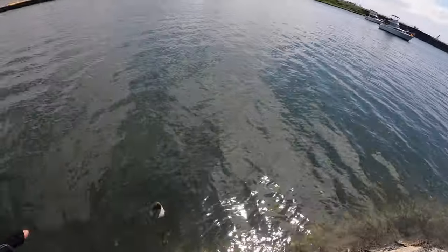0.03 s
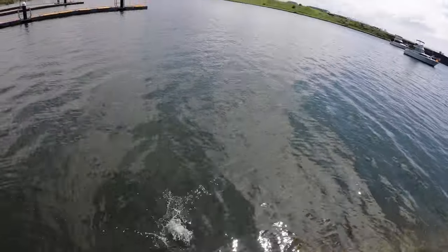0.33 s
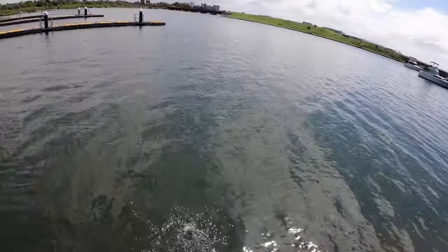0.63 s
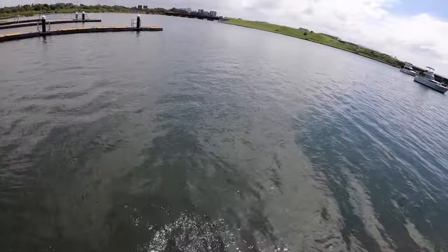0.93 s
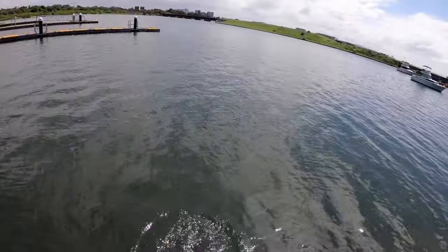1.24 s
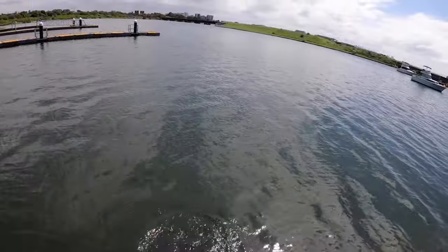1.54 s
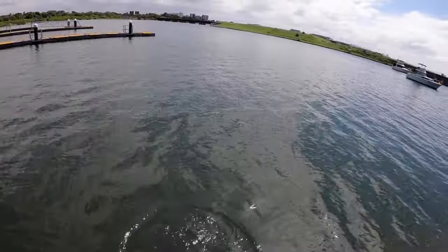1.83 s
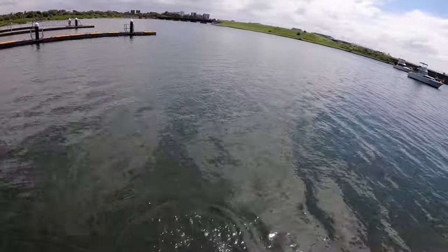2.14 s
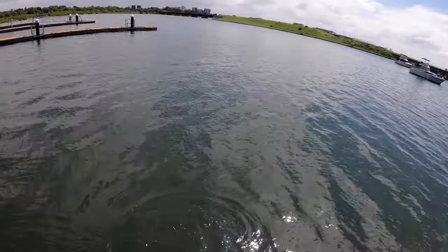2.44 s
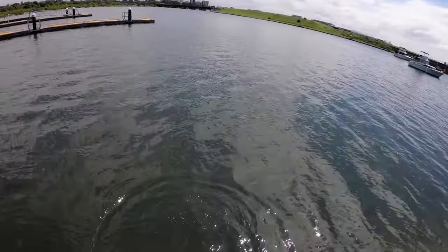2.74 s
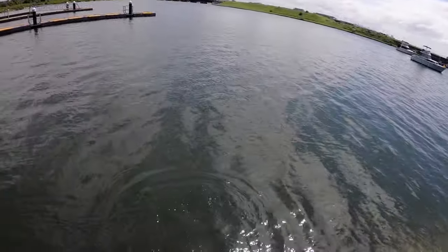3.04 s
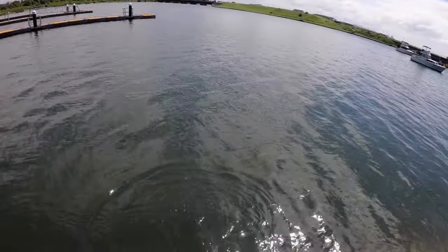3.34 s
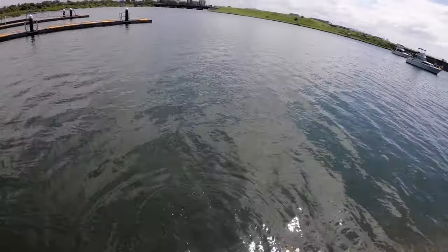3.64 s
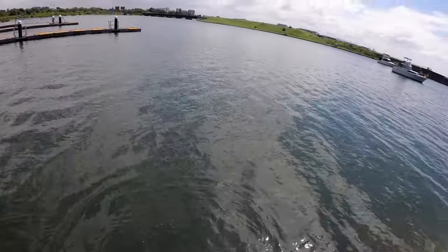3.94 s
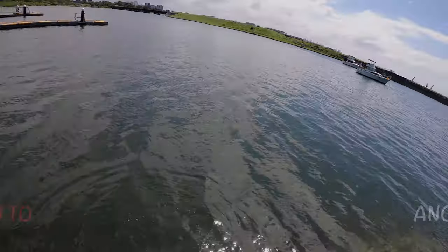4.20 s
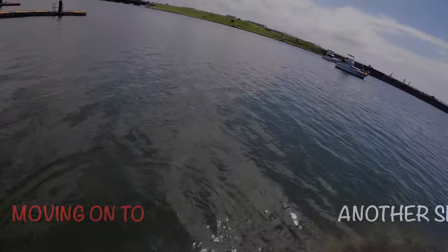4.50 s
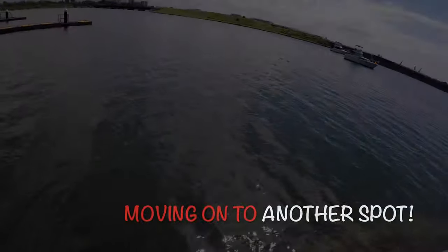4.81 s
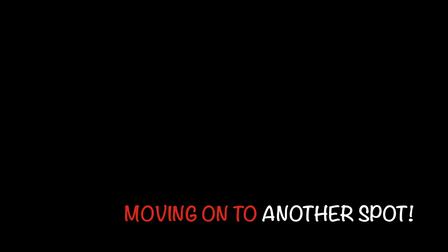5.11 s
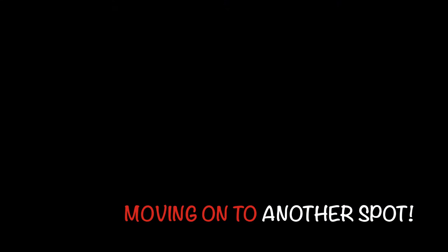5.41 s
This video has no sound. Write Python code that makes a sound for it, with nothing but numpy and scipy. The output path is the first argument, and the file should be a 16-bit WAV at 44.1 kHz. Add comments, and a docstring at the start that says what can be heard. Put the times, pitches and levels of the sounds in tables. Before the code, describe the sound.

Close to the microphone at the edge of a quiet harbour, a small fish lands with a short, bubbly splash and a patter of falling drops. The water settles into scattered little ticks and plops against the stones. Behind it are the low, wavering drone of a far boat engine, a soft wind rumble and a few very faint thin tones. It all fades away at the end.

```python
"""A slap and a gulp: a small fish, tossed back, hits a calm harbour and its air cavity pinches shut.
Thrown-up water falls back, spray patters and trapped bubbles ring. Wavelets then tick and fizz on the
shore stones. Behind are a far boat engine, a faint metallic ring, thin whines and light wind on the
microphone. A sleeve brushes past as everything fades out."""
import sys
import numpy as np
from scipy import signal
from scipy.io import wavfile
from scipy.ndimage import map_coordinates

SR = 44100
rng = np.random.default_rng(int(sys.argv[2]) if len(sys.argv) > 2 else 0)


def dump(signal):
    """Clip the signal to [-1, 1] and save it as 16-bit WAV at the path in sys.argv[1]."""
    limited = np.clip(np.atleast_2d(signal).T, -1, 1)
    pcm = np.round(limited * 32767).astype(np.int16)
    wavfile.write(sys.argv[1], SR, pcm)


N = 245195
T = np.arange(N) / SR

# splash spectrum: f/Hz, density/dB
SPLASH_SPECTRUM = [(290, -35.5), (500, -4.5), (620, -9.5), (716, -7), (1120, -12), (1370, -2.5),
                   (2130, -9.5), (2360, -7), (3190, -10.5), (4250, -16), (5510, -14), (7450, -23.5),
                   (8600, -20), (12300, -36.5), (15500, -51.5)]
# shore fizz spectrum: f/Hz, density/dB
FIZZ_SPECTRUM = [(1500, -2.5), (3000, 10), (4800, 6.5), (6000, 1), (8800, -12), (10500, -28.5),
                 (15000, -32.5)]


def from_db(db):
    return 10 ** (np.asarray(db) / 20)


def rms_one(x):
    return x / np.sqrt(np.mean(x ** 2) + 1e-20)


def panned(db, pan_db):
    """Left and right gains, pan_db apart."""
    return from_db(db + pan_db * np.array([[.5], [-.5]]))


def in_time(rows):
    """Each column of a curve, interpolated over T."""
    times, *columns = np.transpose(rows)
    return [np.interp(T, times, column) for column in columns]


def at_hz(points, hz):
    """A curve read on a log-frequency axis."""
    freqs, values = np.transpose(points)
    return np.interp(np.log(hz), np.log(freqs), values)


def swell(start_s, attack_s, hold_s, release_s):
    """Trapezoid envelope, 0 to 1 and back."""
    fall = 1 - (T - start_s - attack_s - hold_s) / release_s
    return np.clip(np.minimum((T - start_s) / attack_s, fall), 0, 1)


def drift(rate_hz):
    """Slow random wander, rms 1."""
    step = 40
    pole = np.exp(-2 * np.pi * rate_hz * step / SR)
    slow = signal.lfilter([1], [1, -2 * pole, pole * pole], rng.standard_normal(N // step + 2002))[2000:]
    return np.interp(np.arange(N) / step, np.arange(len(slow)), rms_one(slow))


def butter(x, hz, kind):
    """Second-order Butterworth filter."""
    sos = signal.butter(2, np.clip(hz, 10, .45 * SR), kind, fs=SR, output="sos")
    return signal.sosfilt(sos, x + 1e-18)


def ring(clicks, hz, t60_s):
    """Resonator: a unit click starts a decaying unit sine."""
    r, w = from_db(-60 / (t60_s * SR)), 2 * np.pi * hz / SR
    return signal.lfilter([0, np.sin(w)], [1, -2 * r * np.cos(w), r * r], clicks + 1e-18)


def stereo(mid, side, hz):
    """Mid and side to left and right, least alike near 3 kHz."""
    # left-right likeness: f/Hz, correlation
    likeness = [(60, 0.97), (250, 0.97), (640, 0.96), (1400, 0.55), (3000, 0.1), (6800, 0.16), (14000, 0.6)]
    alike = at_hz(likeness, hz)
    return np.sqrt(1 + alike) * mid + np.sqrt(1 - alike) * side * np.array([[1], [-1]])


def add(out, start_s, sound):
    """Mix in a short stereo sound."""
    at = int(start_s * SR)
    out[:, at:at + sound.shape[1]] += sound[:, :N - at]


def banded_noise(spectrum, patchy_db, flicker_hz):
    """Half-octave bands of stereo noise, each flickering by itself; rms 1."""
    out, edges = 0, 15 * 2 ** np.arange(0, 10.1, .5)
    white = rng.standard_normal((2, 2, N))
    for k, (low, high) in enumerate(zip(edges, edges[1:])):
        hz = np.sqrt(low * high)
        if spectrum[0][0] <= hz <= spectrum[-1][0]:
            mid, side = butter(white[k % 2], [low, high], "band")
            gain = from_db(at_hz(spectrum, hz) + patchy_db * drift(flicker_hz))
            out = out + gain * stereo(mid, side, hz)
    return rms_one(out)


def droplets(spectrum, per_s, spread_db, cycles, lowest_hz, pitches=28):
    """Random drops of uneven size, each ringing briefly at its own pitch and place; rms 1."""
    out = np.zeros((2, N))
    for hz in np.geomspace(lowest_hz, 14000, pitches):
        count = int(per_s * N / SR / pitches) + 1
        at = rng.integers(0, N, 20000)[:count]
        chance, place, sign = rng.random((3, 20000))[:, :count]
        size = from_db(spread_db * np.minimum(-np.log(chance), 4)) * np.sign(sign - .5)
        clicks = np.zeros((2, N))
        clicks[:, at] = stereo(size, size * np.sqrt(12) * (place - .5), hz)
        out += from_db(at_hz(spectrum, hz)) * np.sqrt(hz) * rms_one(ring(clicks, hz, cycles / hz))
    return rms_one(out)


def air(breeze_db=-30.5, gust_db=2.5, harbour_db=-40, top_hz=3560):
    """Wind rumbles on the microphone, with one gust; the harbour murmurs far off."""
    # wind spectrum: f/Hz, density/dB
    wind_spectrum = [(15, -28.5), (26, -6), (50, 1.5), (71, 0), (100, -2), (143, -10), (200, -13),
                     (280, -25), (500, -32), (1000, -62)]
    # far harbour spectrum: f/Hz, density/dB
    harbour_spectrum = [(100, -14), (200, 1.5), (330, 6.5), (560, 2.5), (800, 2), (1100, -0.5), (1450, -8),
                        (2000, -26.5), (2800, -44), (4000, -40), (7000, -53.5)]
    gust = swell(start_s=2.51, attack_s=.22, hold_s=.88, release_s=.33)
    wind = from_db(breeze_db + gust_db * gust) * banded_noise(wind_spectrum, patchy_db=.7, flicker_hz=4)
    harbour = from_db(harbour_db) * banded_noise(harbour_spectrum, patchy_db=1, flicker_hz=3.7)
    return butter(wind + harbour, top_hz, "low")


def engine(idle_hz=70.87, throttle_s=2.2, rise_hz_per_s=1.6, wander_hz=.16,
           waver_db=1.5, overtone_waver_db=1.87):
    """A far boat's exhaust note creeps up in pitch; moving air makes each partial waver."""
    # the note coming and going on the wind: t/s, fundamental/dB, overtones/dB
    levels = [(0.0, -25.5, -35), (0.35, -27.5, -47.5), (0.8, -28, -45), (1.3, -26.5, -45),
              (1.88, -26.5, -44), (2.0, -38.5, -41.5), (2.22, -24, -34), (2.45, -36.5, -39.5),
              (2.85, -27, -36), (3.25, -23, -34), (3.4, -27.5, -40.5), (3.71, -25, -39), (3.82, -41, -38),
              (4.1, -49, -36.5), (4.25, -34.5, -36), (4.8, -30, -38)]
    # exhaust overtones: multiple of the firing rate, level/dB
    overtones = [(2, -1.5), (2.75, -11.5), (3, -13), (4.55, -17.5)]
    firing_hz = idle_hz + rise_hz_per_s * np.maximum(T - throttle_s, 0)
    phase = 2 * np.pi * np.cumsum(firing_hz + wander_hz * drift(3.55)) / SR
    fundamental_db, overtones_db = in_time(levels)
    out = from_db(fundamental_db + waver_db * drift(4.7)) * np.sin(phase)
    for multiple, db in overtones:
        gain = from_db(overtones_db + db + overtone_waver_db * drift(.95))
        out += gain * np.sin(multiple * phase + .5 * drift(1.2))
    return np.sqrt(2) * out


def drone(hz=149.7, level_db=-36.5):
    """A second, higher far hum swells and sinks once."""
    gain = from_db(level_db) * swell(start_s=.03, attack_s=.27, hold_s=.48, release_s=.2)
    return np.sqrt(2) * gain * np.sin(2 * np.pi * hz * T)


def faint_tones(strands=9):
    """Thin tones swell and sink, each blurred into wandering strands."""
    # lingering tail of the opening metallic ring, then faint whines and high twitter:
    # start/s, end/s, f/Hz, level/dB, wander/Hz, decay/(dB/s)
    tones = [(0.231, 1.003, 1427, -51, 20.8, -3.5), (0.79, 0.898, 2205, -46, 55, 8),
             (0.884, 1.15, 2224, -56.5, 20, 38), (1.721, 1.87, 4300, -66.5, 410, -3),
             (1.9, 2.25, 4850, -76, 84, 4), (1.901, 2.35, 4360, -75.5, 90, 3),
             (2.445, 2.95, 4730, -79.5, 75, 2), (3.301, 3.752, 4600, -81, 91, -1)]
    out = np.zeros(N)
    for start_s, end_s, hz, db, wander_hz, decay_db_per_s in tones:
        during = (T > start_s) & (T < end_s)
        age_s = T[during] - start_s
        arch = np.sqrt(np.maximum(1 - (2 * age_s / (end_s - start_s) - 1) ** 2, 0))
        gain = from_db(db - decay_db_per_s * age_s) * arch * np.sqrt(2 / strands)
        for _ in range(strands):
            phase = 2 * np.pi * (rng.random() + np.cumsum(hz + wander_hz * drift(20)[during]) / SR)
            out[during] += gain * np.sin(phase)
    return out


def ping():
    """A faint metallic ring dies away at the start."""
    # ringing partials: f/Hz, level/dB, t60/s
    partials = [(1427, -43, 0.54), (4268, -71, 1.9)]
    return np.sqrt(2) * sum(from_db(db - 60 * T / t60_s) * np.sin(2 * np.pi * hz * T)
                            for hz, db, t60_s in partials)


def sleeve(whistle_db=4.5, width_hz=170, thinning_db_per_octave=28, scratch_db=9.5, patchy_db=.5):
    """Threads catch in scratchy grains; the weave whistles higher and thinner as it slides faster."""
    # sleeve stroke: t/s, whistle/Hz, level/dB
    stroke = [(4.17, 5800, -93), (4.24, 6000, -79), (4.34, 6750, -75), (4.41, 6160, -75), (4.46, 6800, -72),
              (4.53, 7300, -67.5), (4.6, 7900, -69), (4.67, 6700, -70), (4.72, 6000, -100)]
    # cloth scratch spectrum: f/Hz, density/dB
    scratch_spectrum = [(1500, 3.5), (2700, 16.5), (4400, 4), (6500, -4), (8800, -13), (10500, -28),
                        (15000, -35)]
    hz, db = in_time(stroke)
    phase = 2 * np.pi * np.cumsum(hz) / SR
    in_phase, quadrature = rms_one(butter(rng.standard_normal((2, 2, N)), width_hz, "low"))
    whistle = in_phase * np.cos(phase) + quadrature * np.sin(phase)
    whistle *= from_db(whistle_db - thinning_db_per_octave * np.log2(hz / hz.min()))
    scratch = droplets(scratch_spectrum, per_s=3000, spread_db=3, cycles=14, lowest_hz=2000)
    sliding = (T > stroke[0][0]) & (T < stroke[-1][0])
    return sliding * from_db(db + patchy_db * drift(22)) * (whistle + from_db(scratch_db) * scratch)


def wet_stones(floor_db=-71, attack_s=.044):
    """The shore fizzes faintly, and more as each wash drains."""
    # washes over the stones: t/s, level/dB, drain time/s
    washes = [(1.7, -68, 0.36), (1.95, -74.5, 0.56), (2.652, -56.5, 0.035), (3.45, -71, 0.21),
              (4.16, -72, 0.38)]
    draining = sum(from_db(db) * swell(start_s, attack_s, 0, drain_s) for start_s, db, drain_s in washes)
    fizz = droplets(FIZZ_SPECTRUM, per_s=9000, spread_db=2.5, cycles=12, lowest_hz=1800)
    return (from_db(floor_db) + draining) * fizz


def lapping(level_db=-82, start_s=1):
    """Tiny bubbles pop between the stones."""
    pops = droplets(FIZZ_SPECTRUM, per_s=31, spread_db=3.5, cycles=22, lowest_hz=1800)
    return from_db(level_db) * np.clip(T - start_s, 0, 1) * pops


def shore_echoes(x, echo_db=-12, t60_s=.14, top_hz=5000, count=14):
    """Adds weak, dull echoes off the stones of the bank."""
    out, dull = x.copy(), butter(x, top_hz, "low")
    for k, delay_s in enumerate(rng.uniform(.0091, .044, count)):
        lag = int(delay_s * SR) + 1
        out[k % 2, lag:] += from_db(echo_db - 60 * delay_s / t60_s) * dull[k % 2, :-lag]
    return out


def mic_ports(x, left_lag_s, width=.27, treble_width=.38, treble_hz=6000):
    """Sound from ahead reaches both ports nearly alike, less so in the treble; each colours it."""
    # favoured band, left port then right: low/Hz, high/Hz, added share
    bands = [(2500, 3900, .3), (6500, 6700, .35)]
    mid = x.mean(axis=0)
    pair = mid + width * (x - mid) + treble_width * butter(x - mid, treble_hz, "high")
    left, right = [port + share * butter(port, [low, high], "band")
                   for port, (low, high, share) in zip(pair, bands)]
    return np.array([map_coordinates(left, [(T - left_lag_s) * SR], order=3), right])


def ticks(drive_t60_s=.011, crack_t60_s=.008, cycles=13, ring_db=-.2, low_hz=1200, top_hz=6740):
    """Drops land and wavelets hit the stones: each a sharp crack and a short ring."""
    # water ticks: t/s, level/dB, ring/Hz, relative crack level/dB, left-right/dB
    hits = [(0.313, -29, 5150, -5.5, -2), (0.346, -34, 11000, -14, -2), (0.4625, -26.5, 3450, -6, 0),
            (0.515, -50, 8500, -3.5, -6), (0.543, -28, 3760, -6, -1), (0.564, -28.5, 3800, 0.5, -3),
            (0.625, -43, 5940, 2, -1), (0.635, -40, 6950, -2, -3), (0.6432, -19.5, 4850, -14.5, 0),
            (0.7057, -32, 2800, -6, -6), (0.7065, -42, 11000, -8, -3), (0.7355, -37, 3830, -27, -9),
            (0.803, -36, 3520, -2, -5), (0.8337, -38, 7600, -1, -7), (0.848, -42, 8000, -1, -4),
            (0.9252, -40, 4160, -5, 1), (0.949, -39, 4400, -8, -7), (0.964, -31, 4000, 1, 0),
            (0.969, -45, 8450, -4, -3), (1.133, -36, 2120, -14, -6), (1.916, -45.5, 5500, 0, 6),
            (2.079, -31, 1980, -18, 4), (2.104, -37.5, 2390, -12, 9), (2.26, -40, 3120, -14, 1),
            (2.364, -50.5, 5130, -9, -5), (2.539, -51, 4620, 6, -2), (2.641, -44.5, 5100, -4.5, -10),
            (2.66, -45, 4560, -11, -.5), (2.672, -39.5, 5400, -3, -9), (2.674, -28.5, 2400, -11, 1),
            (2.688, -25, 2680, -14, 5), (2.6934, -21.5, 2850, -16, -3), (2.694, -34.5, 4670, -10, -3),
            (2.7085, -45, 5400, 3, -3), (2.713, -38, 4860, -5, -5), (2.805, -37.5, 3500, -12.5, -2),
            (2.8112, -34.5, 5170, -9, 0), (2.816, -35, 2700, -14, 2), (3.039, -59, 4000, -3.5, 4),
            (3.147, -51, 5440, -4, -3), (3.168, -56, 6020, 2.5, -2), (3.257, -42.5, 2930, 1, 5),
            (3.283, -52, 6000, -4, -1), (3.476, -36, 2530, -6, 6.5), (3.52, -39.5, 2400, -17, 3),
            (3.565, -49.5, 4050, -12, 5), (3.592, -51.5, 4000, -3, 7), (3.6625, -52, 4100, -7, 8),
            (3.753, -49.5, 4700, 4, 5), (3.756, -54, 8250, -8, -4), (3.8102, -48, 3500, 9.5, 7),
            (3.871, -52, 3720, -6, 12), (4.012, -43, 3020, -5.5, 6), (4.198, -49, 8400, -4, -1),
            (4.285, -48, 4000, -8, 5), (4.334, -53, 6000, -4, 0), (4.342, -38, 2470, -14, 1),
            (4.354, -31.5, 2100, -10, -1), (4.355, -35.5, 4000, -8, -2.5), (4.371, -40, 2170, -14, -3),
            (4.385, -49, 3200, -8, 5)]
    out, t = np.zeros((2, N)), T[:SR // 20]
    for start_s, db, hz, crack_db, pan_db in hits:
        noise = stereo(*rng.standard_normal((2, len(t))), hz)
        crack = butter(noise * from_db(-60 * t / crack_t60_s), [low_hz, top_hz], "band")
        crack = butter(crack, top_hz, "low")
        tone = ring(noise * from_db(-60 * t / drive_t60_s), hz, cycles / hz)
        tone = butter(tone, [hz / 2, 1.3 * hz], "band")
        tick = from_db(crack_db) * crack / abs(crack).max() + from_db(ring_db) * tone / abs(tone).max()
        add(out, start_s, tick * panned(db, pan_db))
    return out


def spray(start_s=.236, spray_db=-36.5, spray_decay_db_per_s=11, foam_db=-48.5, foam_decay_db_per_s=9):
    """Thrown-up drops patter through a mist of tiny ones; some leave ringing bubbles; foam lingers."""
    drops = droplets(SPLASH_SPECTRUM, per_s=2000, spread_db=3.3, cycles=16, lowest_hz=900)
    plinks = droplets(SPLASH_SPECTRUM, per_s=700, spread_db=2.8, cycles=35, lowest_hz=1200, pitches=36)
    mist = banded_noise(SPLASH_SPECTRUM, patchy_db=-1.5, flicker_hz=28)
    patter = from_db(-6.5) * drops + from_db(-6) * butter(plinks, 6500, "low") + from_db(-10) * mist
    fizz = from_db(-5) * mist + from_db(-8.5) * drops
    age_s = T - start_s
    falling = swell(start_s, attack_s=.018, hold_s=.653, release_s=.12)
    spray_gain = falling * from_db(spray_db - spray_decay_db_per_s * age_s)
    foam_gain = (age_s > 0) * (1 - falling) * from_db(foam_db - foam_decay_db_per_s * age_s)
    return butter(spray_gain * patter + foam_gain * fizz, 14500, "low")


def bubbles(t60_at_1khz_s=.027, rise_per_t60=.13, swell_cycles=.35, pan_db=-1, scatter_db=3):
    """Each bubble pinches off, rings, and rises in pitch as it nears the surface."""
    # trapped air pockets: t/s, level/dB, f/Hz
    pockets = [(0.2446, -22.5, 1760), (0.2748, -21, 1940), (0.2742, -28.5, 3100), (0.2785, -20.5, 684),
               (0.308, -24, 1750), (0.3135, -27, 1980), (0.33, -32, 1820), (0.3600, -21.5, 3300),
               (0.363, -22.5, 5230), (0.367, -25, 2670), (0.3942, -22.5, 3130), (0.3969, -30, 2606),
               (0.397, -26, 2010), (0.41, -24.5, 2740), (0.463, -27.5, 2860), (0.4855, -40, 2900),
               (0.549, -37, 3030), (0.5820, -29.5, 2150), (0.607, -33.5, 2600), (0.617, -34.5, 2770),
               (0.6934, -37, 3220), (0.7379, -31, 2940), (0.965, -43, 5430), (1.152, -37, 2180),
               (2.2597, -43, 2500), (2.6305, -28.5, 2130), (2.6736, -30, 1290), (2.692, -32.5, 1540),
               (2.814, -33, 1390), (3.5660, -27.5, 615), (3.8411, -52, 3720), (3.848, -55, 3840),
               (4.354, -36, 1180)]
    out, t = np.zeros((2, N)), T[:SR // 6]
    for (start_s, db, hz), place in zip(pockets, rng.standard_normal(len(pockets))):
        t60_s = t60_at_1khz_s * (1000 / hz) ** .23
        shape = (1 - np.exp(-t * hz / swell_cycles)) * from_db(-60 * t / t60_s)
        tone = np.sin(2 * np.pi * hz * t * (1 + rise_per_t60 * t / t60_s / 2))
        add(out, start_s, tone * shape / shape.max() * panned(db, pan_db + scatter_db * place))
    return out


def gulps(glide_power=2.2, level_flutter=.35, pitch_flutter=.06, flutter_hz=420):
    """A cavity pinches shut: its note glides as the neck changes; the torn walls make it flutter."""
    # closing air cavities: t/s, level/dB, start/Hz, end/Hz, length/s
    cavities = [(0.277, -16.5, 339, 401, 0.0082), (0.286, -25, 368, 450.4, 0.0083),
                (0.293, -27.5, 580, 728, 0.011), (0.3725, -21, 1580, 1238, 0.0097),
                (0.376, -18.5, 803, 721, 0.0098), (0.386, -21.5, 560, 1010, 0.009),
                (0.39, -23, 1150, 1876, 0.0065), (0.407, -32.5, 629, 850, .015),
                (0.723, -25, 742, 1060, 0.022), (0.738, -34, 1316, 1392, 0.015),
                (0.761, -31.5, 522, 537, 0.016)]
    out = np.zeros((2, N))
    for start_s, db, start_hz, end_hz, length_s in cavities:
        progress = np.linspace(0, 1, int(length_s * SR) + 2)
        walls = rms_one(butter(rng.standard_normal((2, SR // 10)), flutter_hz, "low"))
        wobble, flutter = walls[:, -len(progress):]
        hz = start_hz + (end_hz - start_hz) * progress ** glide_power
        phase = 2 * np.pi * np.cumsum(hz * (1 + pitch_flutter * wobble)) / SR
        note = np.sin(phase) * (1 + level_flutter * flutter) / np.hypot(1, level_flutter)
        add(out, start_s, np.sin(np.pi * progress) * note * panned(db, 0))
    return out


def slaps(snap_db=-5.5, snap_hz=8300, base_t60_s=.039, t60_per_swell=6.1):
    """Each blow tears the surface into crackle and froth; more water swells longer and dies slower."""
    # blows on the water: t/s, level/dB, swell/s, top edge/Hz
    blows = [(0.242, -29.5, 0.0039, 11180), (0.254, -40.5, .005, 10000), (0.2733, -23.5, 0.0023, 6470),
             (0.305, -36.5, 0.0063, 8650), (0.347, -40, 0.0056, 13060), (0.357, -27.5, 0.0041, 10460),
             (0.37, -27, 0.0086, 8000), (0.39, -36.5, 0.002, 4060), (0.620, -35, 0.0052, 10900),
             (0.643, -31.5, 0.00033, 7670), (0.695, -35.5, 0.017, 5540), (0.73, -28.5, 0.0024, 7000)]
    crackle = droplets(SPLASH_SPECTRUM, per_s=12000, spread_db=2.5, cycles=4, lowest_hz=700)
    sheet = banded_noise(SPLASH_SPECTRUM, patchy_db=-4.5, flicker_hz=130)
    froth = droplets(SPLASH_SPECTRUM, per_s=1500, spread_db=2.5, cycles=25, lowest_hz=600)
    water = from_db(-2) * crackle + from_db(-3.5) * (sheet + froth)
    water += from_db(snap_db) * (water - butter(water, snap_hz, "low"))
    out, t = np.zeros((2, N)), T[:SR // 4]
    for start_s, db, swell_s, top_hz in blows:
        t60_s = base_t60_s + t60_per_swell * swell_s
        shape = np.minimum(t / swell_s, 1) ** 2 * from_db(db - 60 * np.maximum(t - swell_s, 0) / t60_s)
        at = int(start_s * SR)
        add(out, start_s, butter(water[:, at:at + len(t)] * shape, top_hz, "low"))
    return out


def scene():
    """Splash, wavelets and sleeve close by; engine and air behind."""
    splash = mic_ports(slaps() + spray(), left_lag_s=1e-5)
    plops = mic_ports(bubbles() + gulps(), left_lag_s=4e-5)
    water = splash + plops + lapping() + ticks()
    background = engine() + drone() + faint_tones() + ping()
    near = wet_stones() + sleeve()
    return shore_echoes(water) + near + background + air()


def record(dry):
    """Fade-out, left slightly louder, steep treble cut."""
    fade_start_s, fade_end_s, floor_db, cutoff_hz = 4.358, 5.018, -85.5, 15300
    fader = np.clip((fade_end_s - T) / (fade_end_s - fade_start_s), 0, 1) ** 1.595 + from_db(floor_db)
    faded = dry * fader * panned(0, pan_db=.8)
    return signal.sosfilt(signal.ellip(10, .1, 80, cutoff_hz, fs=SR, output="sos"), faded)


dry = scene()
out = record(dry)
dump(out)
```